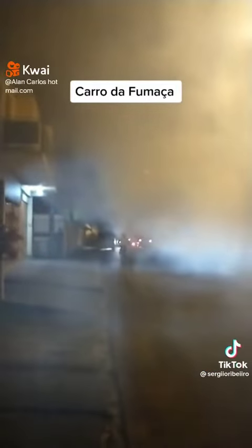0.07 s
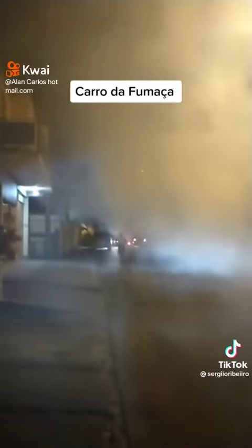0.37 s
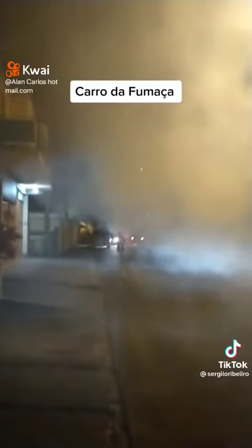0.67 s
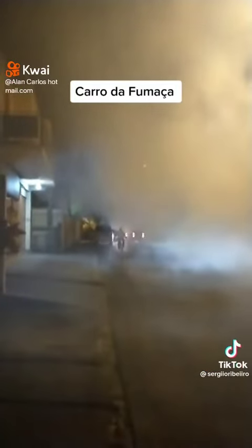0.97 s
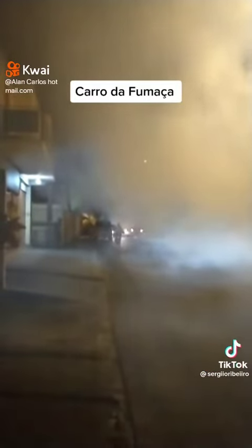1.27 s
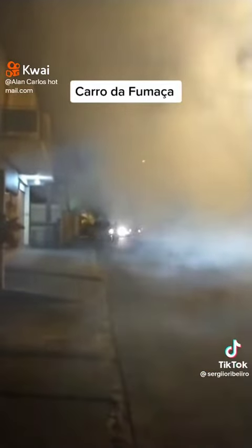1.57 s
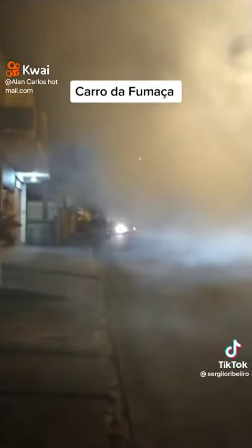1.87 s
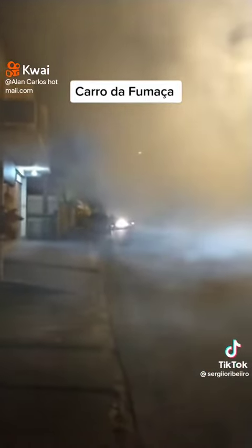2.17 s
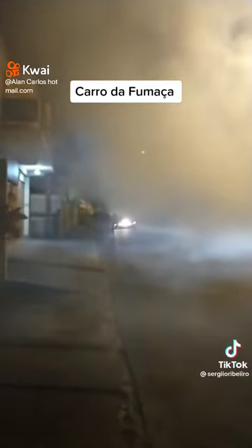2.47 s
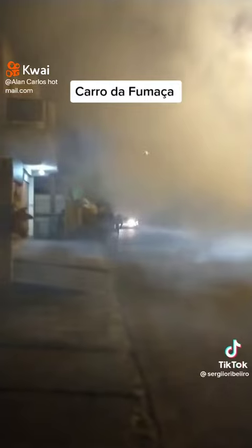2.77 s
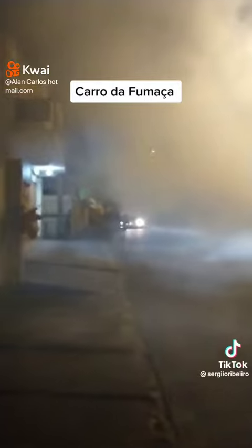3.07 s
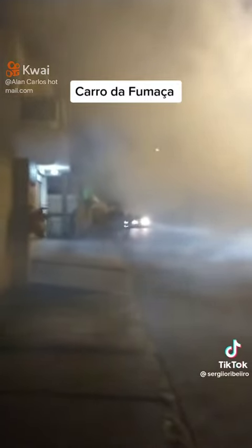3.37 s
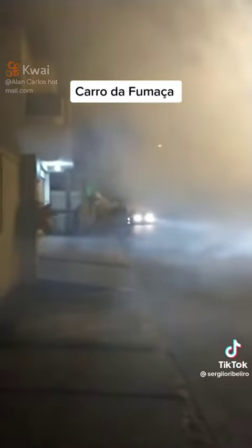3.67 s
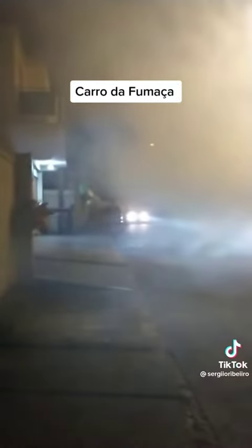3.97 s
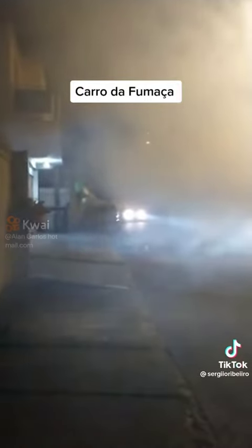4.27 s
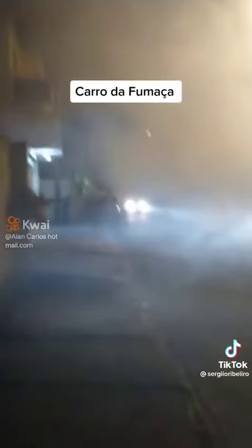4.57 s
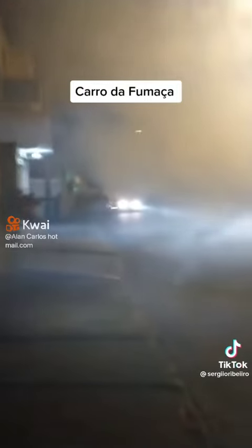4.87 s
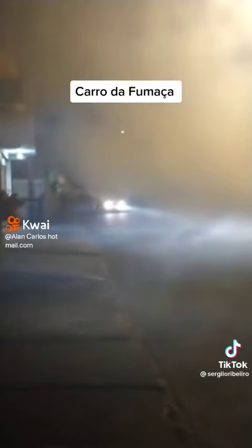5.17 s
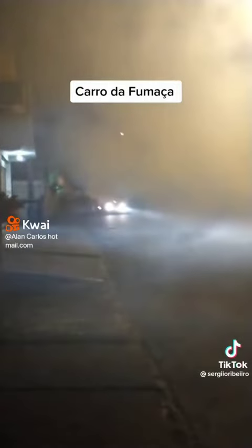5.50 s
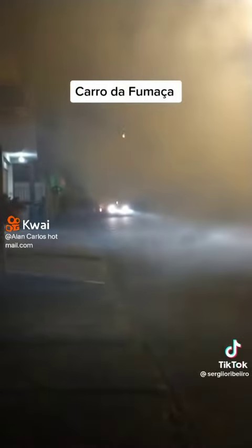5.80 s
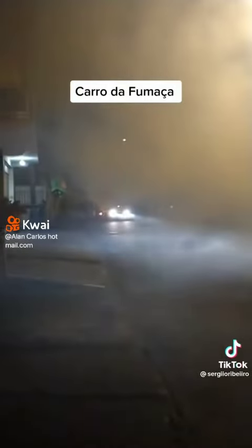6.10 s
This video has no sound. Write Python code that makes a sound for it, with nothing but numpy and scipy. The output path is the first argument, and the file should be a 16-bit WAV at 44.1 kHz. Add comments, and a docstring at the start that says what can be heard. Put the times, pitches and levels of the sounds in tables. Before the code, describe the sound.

Heard from one spot in a narrow street, a truck-mounted fogger approaches with a loud, low, blaring drone. The pitch dips a little near the start as the sound swells, then stays steady, with overtones rising and fading between the houses. An exhaust rasp and a nozzle hiss build as it nears, and the truck's engine gives one soft rev beneath the drone shortly before the end.

```python
"""A narrow street at night, one microphone; a pickup carrying a pulse-jet fogger is some way off.
In the first half second it clears a corner, and the jet settles from 90 to about 82 firings a second.
As it creeps closer, house fronts reflect the drone, so each overtone swells and fades, and every firing
drives a puff of turbulent gas out of the pipe. Near 4.7 s the pickup's engine revs once and eases off.
By the end the vehicle is close to the microphone and the nozzle's hiss has opened up."""
import sys
import numpy as np
from scipy import signal
from scipy.fft import rfft, irfft, next_fast_len
from scipy.io import wavfile
from scipy.ndimage import uniform_filter1d

SR = 44100
rng = np.random.default_rng(int(sys.argv[2]) if len(sys.argv) > 2 else 0)


def log_audio(samples):
    """Write samples as a 16-bit WAV file to the path given in sys.argv[1]."""
    # one column per channel
    frames = np.atleast_2d(samples).T
    # limit to full scale, then quantise
    limited = np.clip(frames, -1, 1)
    pcm = np.round(limited * 32767).astype(np.int16)
    wavfile.write(sys.argv[1], SR, pcm)


N = 275184
TIME = np.arange(N) / SR

# the jet's firing rate: time_s, rate_hz
FIRING_RATE = [(0.02, 90.15), (0.24, 90.73), (0.51, 85.7), (0.62, 82.6), (2.07, 82.1), (2.08, 82.96),
               (2.53, 82.4), (2.58, 83.3), (2.9, 81.87), (3.25, 83.2), (3.33, 82.11), (3.79, 81.91),
               (4.08, 84.4), (4.29, 82.3), (4.61, 81.83), (5.07, 82.95), (5.21, 82.03), (6.15, 82.03)]
# how close the vehicle sounds, 0 far to 1 at the microphone: time_s, nearness
NEARNESS = [(0, 0), (2.6, 0.17), (3.9, 0.4), (5.0, 0.86), (6.24, 0.99)]
# the three deepest harmonics at the microphone: time_s, level_db
FIRST_HARMONIC = [(0.02, -40.5), (0.55, -30), (0.71, -41.5), (0.79, -31), (1.24, -24.5), (1.76, -24.5),
                  (1.86, -29.5), (3.05, -22), (3.64, -31), (3.98, -27), (4.41, -32), (4.88, -27),
                  (5.09, -32), (5.16, -40), (5.36, -36), (5.47, -47), (6.04, -27.5), (6.21, -27)]
SECOND_HARMONIC = [(0.02, -44.5), (0.66, -23), (0.98, -25.5), (1.24, -22.5), (1.36, -31), (1.54, -21),
                   (2.17, -18), (3.12, -20), (4.04, -19), (4.09, -22), (4.3, -17), (4.71, -16), (4.88, -24),
                   (5.26, -16.5), (5.57, -26.5), (5.61, -39), (5.66, -26.5), (6.21, -16.5)]
THIRD_HARMONIC = [(0.04, -37), (0.18, -42.5), (0.76, -32.5), (1.16, -49), (1.33, -30.5), (1.5, -50),
                  (1.55, -35.5), (2.4, -26.5), (4.03, -27), (4.1, -40), (4.14, -34), (5.12, -24.5),
                  (5.41, -31.5), (5.46, -47), (5.51, -28), (6.22, -25)]
# middle and upper overtones: multiple of the firing rate, relative_db
BLARE_HARMONICS = {4: 0.85, 5: -2.5, 6: -0.1}
BUZZ_HARMONICS = {7: 0, 8: -1.3, 9: -2.7}
# reflections that briefly lift or cancel the blare: centre_s, focus_hz, lift_db, half_length_s
REFLECTION_SWELLS = [(0.098, 470, 1, 0.22), (.47, 522, 2.5, 0.07), (0.582, 329.7, -5, 0.037),
                     (.72, 420, 2, 0.043), (.92, 400, 3, 0.053), (1.19, 393, 2, 0.078),
                     (1.517, 445, -2, 0.074), (1.61, 400, 1.5, 0.033), (1.82, 329, 4.5, 0.035),
                     (1.96, 413, 3.5, 0.046), (2.72, 405, 1.5, 0.11), (2.96, 470, 2.5, 0.07),
                     (3.17, 338, 4, 0.066), (3.33, 382, 2.5, 0.049), (3.5, 372.1, 5.5, 0.085),
                     (3.68, 370, -3.5, .08), (3.86, 416.5, 0.5, .05), (4.17, 374, 1, .09),
                     (4.36, 357, -3.5, 0.058), (4.92, 370, 4, 0.043), (5.1, 342, 4, 0.042),
                     (5.396, 335.6, 4, 0.056), (5.488, 466.4, 2.5, 0.049), (5.598, 369.3, 6.5, .04),
                     (5.749, 360, 2.5, 0.095), (5.95, 386.8, 1, .04), (6.207, 469, -8, 0.082)]
# the upper overtones, which carry less far, before their trim: time_s, level_db
BUZZ_LEVEL = [(0.04, -48.5), (0.71, -35.5), (0.88, -36.5), (1.18, -31), (1.71, -38.5), (1.8, -28.5),
              (3.51, -27.5), (3.73, -22.5), (3.99, -32), (4.16, -22), (4.28, -30), (4.4, -24.5),
              (4.71, -31.5), (4.74, -24.5), (5.29, -31.5), (5.44, -23.5), (6.16, -24.5), (6.18, -35.5)]
# rasp and hiss growing up the street, before their trims: time_s, rasp_db, hiss_db
APPROACH_LEVELS = [(0.04, -44.5, -61.5), (0.3, -45, -61.5), (0.49, -40.5, -59.5), (1.77, -36.5, -56),
                   (3.54, -36, -54.5), (3.81, -34.5, -55), (4.72, -34.5, -53), (4.93, -31.5, -50.5),
                   (5.07, -32, -51.5), (5.24, -33, -45.5), (5.51, -28.5, -45), (6.2, -29.5, -40)]
# spectra of the burning, and of pipe and nozzle from afar and close by: frequency_hz, relative_db
ROAR_SPECTRUM = [(20, -25), (50, -20.5), (100, -8), (200, -8), (290, -1.5), (360, -1), (450, -1.5),
                 (600, -1.5), (720, -2), (820, -16), (1100, -43.5)]
RASP_FAR = [(720, -23.5), (820, 1), (1050, -4), (1250, -2), (1550, -5.5), (2000, -6.5), (2450, -10),
            (2850, -10.5), (3350, -31), (4000, -41.5)]
RASP_NEAR = [(720, -21), (820, 0), (1020, -0.5), (1220, -9), (1450, -7), (1720, -9.5), (2100, -10),
             (2450, -11), (2850, -11), (3350, -15.5), (4000, -37)]
HISS_FAR = [(1820, -21.5), (3100, -6), (3380, -6.5), (4680, -10), (5530, -15.5), (7700, -20), (10000, -68),
            (16900, -120)]
HISS_NEAR = [(1820, -28), (3100, -0.5), (3360, -10.5), (3600, 0), (4620, -3.5), (5150, -9), (5600, -19.5),
             (6270, -13.5), (7700, -13.5), (10000, -45.5), (16900, -120)]
# pipe and street resonances that stand out in turn: centre_hz, half_width_hz, lift_db, peak_s, half_length_s
RESONANCES = [(797, 46, 7.5, 2.55, 0.55), (1030, 100, 4.5, 0.6, 0.63), (1070, 55, 8.5, 3.83, 0.93),
              (1060, 74, 6, 5.6, 1.5), (1332, 45, 9, 2.05, 0.55), (1580, 130, 3.5, 3.3, .45),
              (1340, 40, 11.5, 5.84, 2.2), (1478, 64, 8.5, 5.4, 1.6), (1774, 87, 5, 1.6, 0.81),
              (2071, 160, 10, 5.18, 1.3), (2130.5, 110, 7, 4.0, 0.36), (2210, 120, 3.5, 1.1, 1.1),
              (2720, 210, 7, 4.11, 1.3), (2974, 130, 8.5, 2.3, .5)]
# echoes off the house fronts: delay_s, gain_db
HOUSE_ECHOES = [(0.017, -10), (0.042, -6.5), (.071, -10.5), (0.117, -7.5)]


def jet_boom(phase):
    """The pipe's deep, clean harmonics; the lowest two form standing waves between the houses."""
    first = from_db(in_time(FIRST_HARMONIC)[0]) * overtone(phase, 1, scattered=0.0081, flutter_hz=3.3)
    second = from_db(in_time(SECOND_HARMONIC)[0]) * overtone(phase, 2, scattered=0.036, flutter_hz=5.7)
    third = from_db(in_time(THIRD_HARMONIC)[0]) * overtone(phase, 3, scattered=0.23, flutter_hz=4.7)
    return first + second + third


def jet_blare(phase, firing_hz, focus_db=11, focus_width_hz=68):
    """The middle overtones take turns in front as shifting reflections reinforce a wandering pitch."""
    level_db = past_corner_db(open_db=-23, rasp_share=0.094, screened_db=16.2)
    focus_hz = 390.5 + 33 * scatter(rate_hz=4.3).real
    for centre_s, swell_hz, lift_db, half_length_s in REFLECTION_SWELLS:
        swell = bell(TIME, centre_s, half_length_s)
        level_db = level_db + lift_db * swell
        focus_hz = focus_hz + (swell_hz - focus_hz) * np.sqrt(swell)
    tone = 0
    for order, db in BLARE_HARMONICS.items():
        reinforced_db = focus_db * bell(order * firing_hz, focus_hz, focus_width_hz)
        tone += from_db(db + reinforced_db) * overtone(phase, order, scattered=0.29, flutter_hz=7.9)
    return from_db(level_db) * steady_power(tone, window_s=0.091)


def jet_buzz(phase, near, far_step_db=-4, trim_db=-2.05):
    """The upper overtones flutter more deeply; from down the street the lowest carries best."""
    tone = 0
    for step, (order, db) in enumerate(BUZZ_HARMONICS.items()):
        dulled_db = far_step_db * (1 - near) * step
        tone += from_db(db + dulled_db) * overtone(phase, order, scattered=0.55, flutter_hz=6.6)
    return from_db(in_time(BUZZ_LEVEL)[0] + trim_db) * steady_power(tone, window_s=0.25)


def combustion_roar(phase, near, far_cutoff_hz=540):
    """Unsteady burning fills the gaps between the overtones; it is duller at a distance."""
    close = gas_puffs(phase, ROAR_SPECTRUM, depth=1.0)
    lowpass = signal.butter(2, far_cutoff_hz, fs=SR, output="sos")
    far = unit_rms(signal.sosfilt(lowpass, gas_puffs(phase, ROAR_SPECTRUM, depth=0.94)))
    level_db = past_corner_db(open_db=-30, rasp_share=0.48, screened_db=7.1)
    return from_db(level_db) * crossfade(far, close, near)


def pipe_rasp(phase, near, tone_db=-4.0, blur_hz=1900):
    """High overtones, ever more blurred by uneven firing, sink into puffs of exhaust noise."""
    tone, power = 0, 0
    usual_firing_hz = np.median(np.array(FIRING_RATE)[:, 1])
    for order in range(10, 21):
        hz = order * usual_firing_hz
        gain = (1 - near) * gain_at(RASP_FAR, hz) + near * gain_at(RASP_NEAR, hz)
        gain /= 1 + (hz / blur_hz) ** 2
        tone += gain * overtone(phase, order, scattered=0.8, flutter_hz=0.71 * order)
        power += gain ** 2
    far = gas_puffs(phase, RASP_FAR, depth=0.29)
    close = gas_puffs(phase, RASP_NEAR, depth=0.77)
    noise = house_echoes(crossfade(far, close, near))
    return resonate(from_db(tone_db) * tone / np.sqrt(power) + noise)


def nozzle_hiss(phase, near):
    """Fog sprays from the nozzle; its top reaches the microphone only at close range."""
    far = gas_puffs(phase, HISS_FAR, depth=0.086)
    close = gas_puffs(phase, HISS_NEAR, depth=0.21)
    return house_echoes(crossfade(far, close, near ** 4))


def pickup_engine(idle_hz=179, top_hz=207, idle_db=-53.5, rev_db=-32.5):
    """The pickup's exhaust note and its octave hum under the jet, higher and louder with the throttle."""
    peak_s, rise_s, fall_s = 4.72, 0.27, 0.26
    easing_off = np.exp(-np.abs(TIME - peak_s) / fall_s)
    throttle = np.where(TIME < peak_s, bell(TIME, peak_s, rise_s), easing_off)
    phase = 2 * np.pi * np.cumsum(idle_hz + (top_hz - idle_hz) * throttle) / SR
    note = overtone(phase, 1, scattered=0.33, flutter_hz=13.0)
    octave = from_db(-9) * overtone(phase, 2, scattered=0.19, flutter_hz=5.3)
    return (from_db(idle_db) + from_db(rev_db) * np.sqrt(throttle)) * (note + octave)


def past_corner_db(open_db, rasp_share, screened_db, clear_s=0.37, spread_s=0.07):
    """A level screened at first by the corner, then following a share of the rasp's rise."""
    rasp_db = in_time(APPROACH_LEVELS)[0]
    hidden = 0.5 - 0.5 * np.tanh((TIME - clear_s) / spread_s)
    return open_db + rasp_share * (rasp_db - rasp_db.mean()) - screened_db * hidden


def resonate(x):
    """Resonances of pipe and street come and go in a sound while its power holds steady."""
    hz, frame_s, frames = signal.stft(x, SR, nperseg=2048)
    lift_db = 0
    for centre_hz, half_width_hz, db, peak_s, half_length_s in RESONANCES:
        lift_db += db * bell(hz[:, None], centre_hz, half_width_hz) * bell(frame_s, peak_s, half_length_s)
    ringing = signal.istft(frames * from_db(lift_db), SR)[1][:N]
    return steady_power(ringing, window_s=0.25)


def house_echoes(x):
    """The house fronts send delayed copies to the microphone; rms 1."""
    echoes = sum(from_db(db) * np.interp(TIME - delay_s, TIME, x, left=0) for delay_s, db in HOUSE_ECHOES)
    return unit_rms(x + echoes)


def overtone(phase, order, scattered, flutter_hz, wander_rad=0.58):
    """One harmonic: a direct path drifting in phase as the vehicle moves, plus a scattered share."""
    angle = order * phase + rng.uniform(0, 2 * np.pi) + wander_rad * scatter(rate_hz=0.48).real
    paths = np.sqrt(1 - scattered) + np.sqrt(scattered) * scatter(flutter_hz)
    return np.sqrt(2) * (paths.real * np.cos(angle) - paths.imag * np.sin(angle))


def scatter(rate_hz):
    """Many shifting sound paths add up to a slow complex gain of power 1."""
    step, run_in = 40, 2000   # samples per point, points to settle
    white = rng.standard_normal((2, N // step + run_in + 2))
    lowpass = signal.butter(2, rate_hz, fs=SR / step, output="sos")
    real, imag = signal.sosfilt(lowpass, white)[:, run_in:]
    return np.interp(np.arange(N) / step, np.arange(len(real)), unit_rms(real + 1j * imag))


def gas_puffs(phase, spectrum, depth):
    """Turbulence that surges with each firing, shaped to a spectrum; rms 1."""
    puffs = rng.standard_normal(N) * np.exp(depth * np.cos(phase))
    size = next_fast_len(N)
    hz = np.arange(size // 2 + 1) * SR / size
    return unit_rms(irfft(rfft(puffs, size) * gain_at(spectrum, hz), size)[:N])


def gain_at(spectrum, hz):
    """Gain of a spectrum at given frequencies, falling steeply beyond its ends."""
    points_hz, db = np.transpose(spectrum)
    hz = np.maximum(hz, 1)
    skirts = np.minimum(1, np.minimum(hz / points_hz[0], points_hz[-1] / hz)) ** 4
    return from_db(np.interp(np.log(hz), np.log(points_hz), db)) * skirts


def crossfade(far, close, near):
    """Pass from the distant sound to the close one at constant power."""
    return np.sqrt(1 - near) * far + np.sqrt(near) * close


def steady_power(x, window_s):
    """Hold the power near 1 over a sliding window."""
    power = np.abs(uniform_filter1d(x * x, int(window_s * SR)))
    return x / np.sqrt(power + 1e-9)


def bell(x, centre, half_width):
    """A smooth rise and fall, 1 at the centre."""
    return np.exp(-((x - centre) / half_width) ** 2)


def in_time(rows):
    """Each column after time_s, at every sample."""
    time_s, *columns = np.transpose(rows)
    return [np.interp(TIME, time_s, column) for column in columns]


def from_db(db):
    """Decibels to gain."""
    return 10 ** (np.asarray(db) / 20)


def unit_rms(x):
    """Scale to unit power."""
    return x / np.sqrt(np.mean(np.abs(x) ** 2) + 1e-20)


def scene(rasp_trim_db=0.3, hiss_trim_db=2.16):
    """From one spot in the street: the fogger's layers on one firing cycle, the engine underneath."""
    firing_hz = in_time(FIRING_RATE)[0]
    rasp_db, hiss_db = in_time(APPROACH_LEVELS)
    near = in_time(NEARNESS)[0]
    phase = 2 * np.pi * np.cumsum(firing_hz) / SR
    drone = jet_boom(phase) + jet_blare(phase, firing_hz) + jet_buzz(phase, near)
    roar = combustion_roar(phase, near)
    rasp = from_db(rasp_db + rasp_trim_db) * pipe_rasp(phase, near)
    hiss = from_db(hiss_db + hiss_trim_db) * nozzle_hiss(phase, near)
    return (drone + roar + rasp + hiss + pickup_engine())[None]


def record(dry, ceiling=0.8, cutoff_hz=7900):
    """At the microphone, peaks are slightly rounded and the top is cut."""
    rounded = ceiling * np.tanh(dry / ceiling)
    return signal.sosfilt(signal.ellip(12, 0.1, 80, cutoff_hz, fs=SR, output="sos"), rounded)


dry = scene()
out = record(dry)
log_audio(out)
```